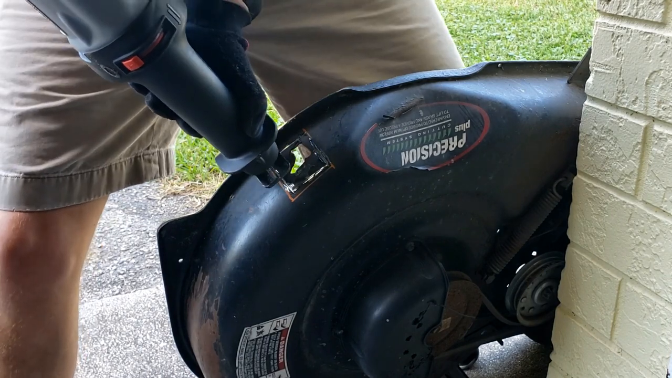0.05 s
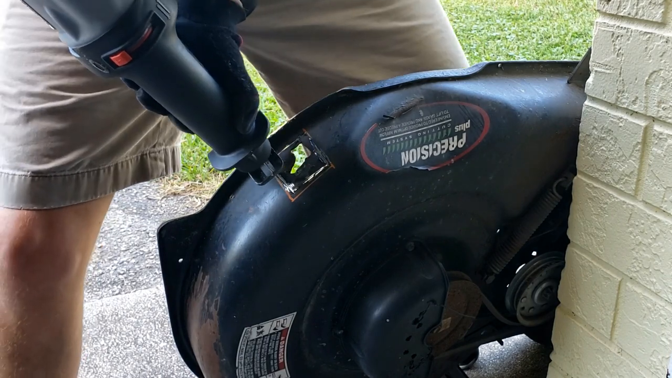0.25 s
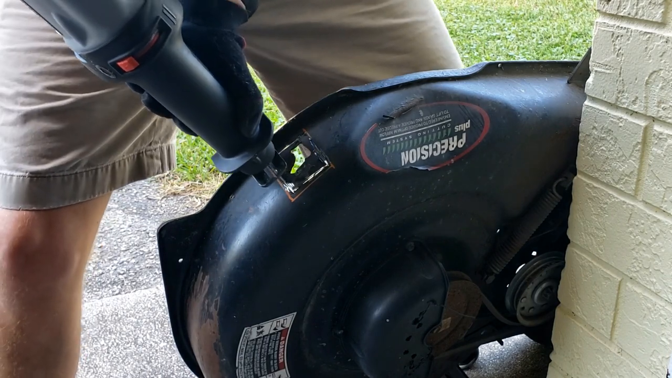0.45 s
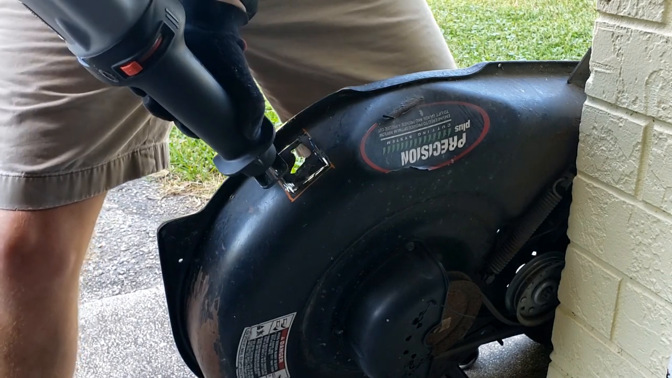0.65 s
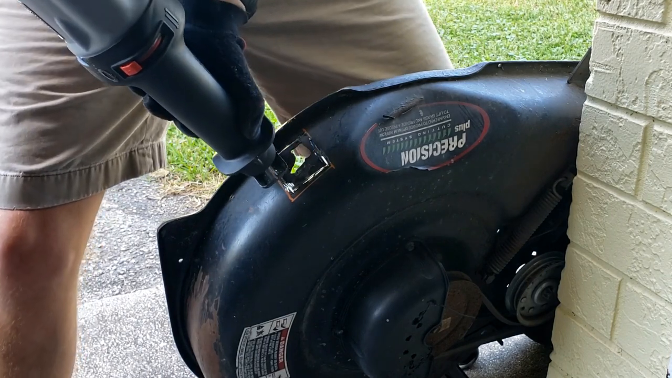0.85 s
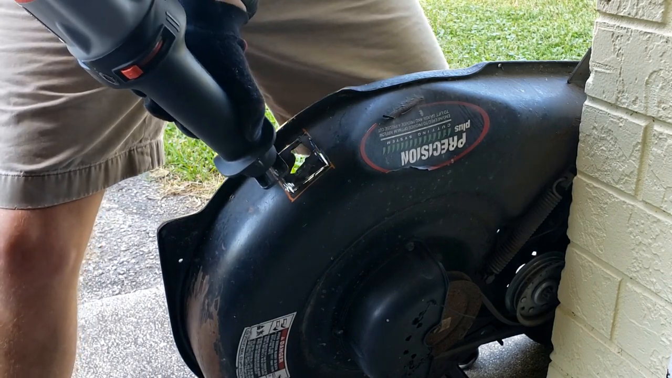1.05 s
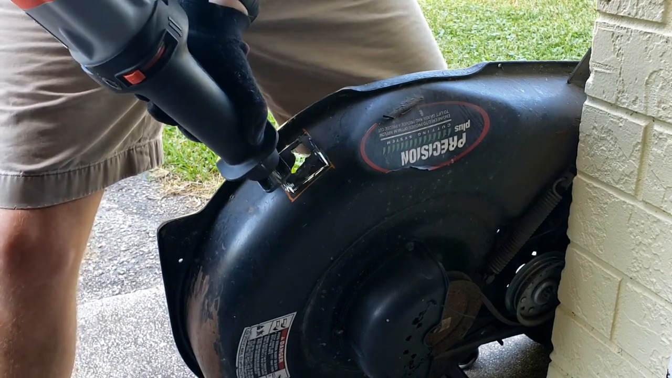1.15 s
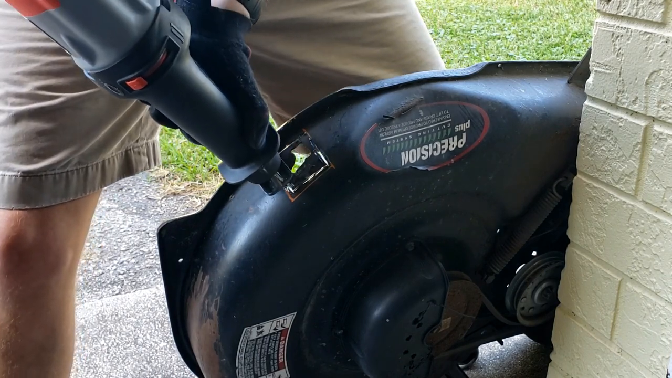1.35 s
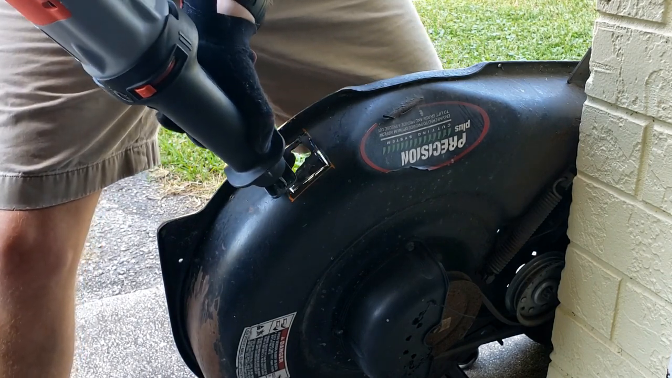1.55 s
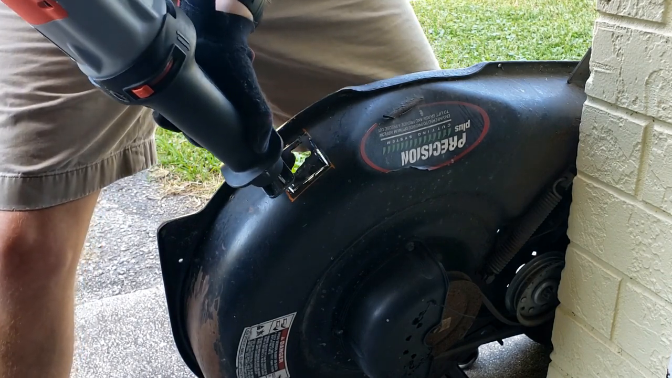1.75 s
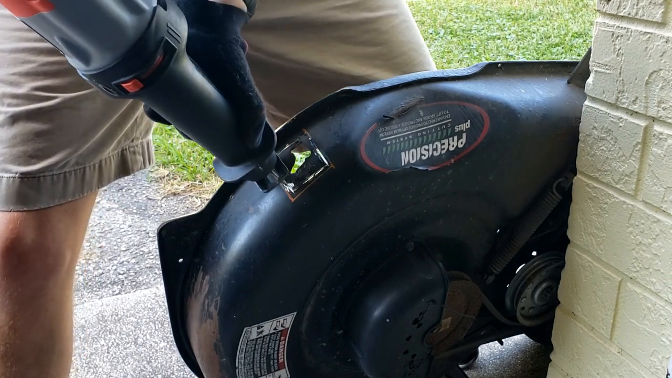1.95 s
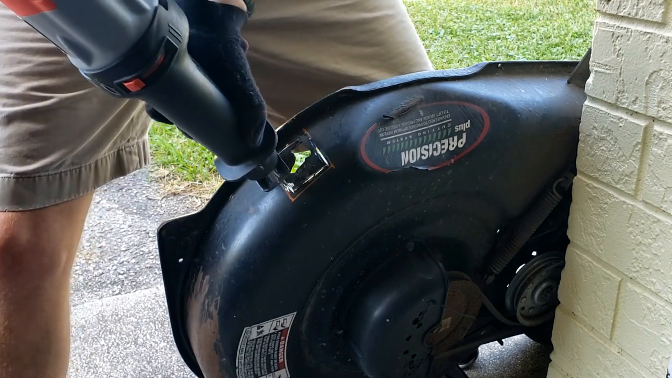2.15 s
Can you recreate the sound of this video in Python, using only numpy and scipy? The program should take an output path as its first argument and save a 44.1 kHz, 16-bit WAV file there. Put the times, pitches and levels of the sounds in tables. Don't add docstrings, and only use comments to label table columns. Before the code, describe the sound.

A reciprocating saw cuts a thin steel mower deck close to the microphone outdoors; uneven clattering strokes, hard snags and ringing clangs build, then it runs down with a last knock over faint breeze.

```python
import sys
import numpy as np
from scipy import signal
from scipy.io import wavfile

SR = 44100
rng = np.random.default_rng(int(sys.argv[2]) if len(sys.argv) > 2 else 0)


def nominal_scale(level):
    x = np.asarray(level, float) / 20
    return 10 ** x


def wav_out(sig):
    wavfile.write(sys.argv[1], SR, np.round(np.clip(np.atleast_2d(sig).T, -1, 1) * 32767).astype(np.int16))


N = 97020


def rms_one(x):
    return x / np.sqrt(np.mean(x ** 2) + 1e-20)


def drift(rate):
    hop = 40
    settle = 2000
    r = np.exp(-2 * np.pi * rate * hop / SR)
    white = rng.standard_normal(N // hop + 2 + settle)
    slow = signal.lfilter([1], [1, -2 * r, r * r], white)[settle:]
    return np.interp(np.arange(N) / hop, np.arange(len(slow)), rms_one(slow))


def at_hz(points, hz):
    points = np.array(points)
    return np.interp(np.log(hz), np.log(points[:, 0]), points[:, 1])


def bandpass(x, low_hz, high_hz):
    return signal.sosfilt(signal.butter(2, [low_hz, high_hz], "band", fs=SR, output="sos"), x)


LEFT_DB, LEFT_LAG_S = -0.97, 0.000115


def late(pair, lag_s):
    n = np.arange(N)
    left = np.interp(n - lag_s * SR, n, pair[0])
    return np.array([nominal_scale(LEFT_DB) * left, pair[1]])


# (frequency [Hz], shared part [0-1])
LIKENESS = [(100, .98), (500, 0.79), (1200, 0.54), (2500, 0.35), (6000, 0.035), (14000, 0.06)]


def likeness(hz):
    return np.clip(at_hz(LIKENESS, hz), 0, 1)


def banded(spectrum, patchy_db, rate):
    out = 0
    edges = 18.6 * 2 ** np.arange(0, 10.1, 0.5)
    white = rng.standard_normal((2, 2, N))
    for k, (low, high) in enumerate(zip(edges, edges[1:])):
        if spectrum[0][0] >= high or low >= spectrum[-1][0]:
            continue
        hz = np.sqrt(low * high)
        mid, side = bandpass(white[k % 2], low, high)
        alike = likeness(hz)
        pair = np.sqrt(1 + alike) * mid + np.sqrt(1 - alike) * side * [[1], [-1]]
        out = out + nominal_scale(at_hz(spectrum, hz) + patchy_db * drift(rate)) * pair
    return rms_one(out)


def line(power, hz):
    level = np.sqrt(2 * power) * nominal_scale(1.6 * drift(42))
    pitch = hz * (1 + 0.0031 * drift(12.2))
    x = level * np.sin(2 * np.pi * np.cumsum(pitch) / SR)
    return late([x, x], LEFT_LAG_S)


MODE_LAG_SPREAD_S, MODE_SIDE = 0.00003, 0.38


def mode(force, hz, t60):
    r, w = nominal_scale(-60 / (t60 * SR)), 2 * np.pi * hz / SR
    gain = np.sin(w) * rng.choice([-1, 1])
    mid, side = signal.lfilter([0, gain], [1, -2 * r * np.cos(w), r * r], force + 1e-18)
    side = side * np.sqrt(1 - likeness(hz)) * MODE_SIDE
    lag_s = LEFT_LAG_S + MODE_LAG_SPREAD_S * hz / 1000 * rng.standard_normal()
    return late([mid + side, mid - side], max(lag_s, 0))


STAGES = [
    0.33,
    0.99,
    1.56,
]
WEIGHT_WANDER_DB = 2.0


def staged(force, modes):
    t = np.arange(N) / SR
    out = 0
    for hz, early, middle, final, t60 in modes:
        weight_db = np.interp(t, STAGES, [early, middle, final])
        out = out + mode(force * nominal_scale(weight_db + WEIGHT_WANDER_DB * drift(4.2)), hz, t60)
    return out


def bursts(rows, rise_s, fall_s, peak_s, axis):
    rows = np.array(rows)
    t = np.arange(N) / SR - rows[:, :1] - peak_s
    swell = np.exp(-(t / rise_s) ** 2)
    decay = np.exp(-2 * np.maximum(t, 0) / fall_s)
    return nominal_scale(2 * rows[:, axis]) @ np.where(t < 0, swell, decay)


# (time [s], level [dB])
BREEZE_LEVEL = [
    (0.0, -53.5),
    (0.6, -51),
    (1.03, -53.5),
    (1.44, -61.5),
    (1.689, -55.5),
    (2.2, -57.5),
]
# (frequency [Hz], level [dB])
BREEZE_COLOUR = [(20, -29), (40, -3.5), (60, -2), (100, 4.5), (140, -14), (220, -20)]


def breeze():
    level = nominal_scale(np.interp(np.arange(N) / SR, *np.transpose(BREEZE_LEVEL)))
    return level * banded(BREEZE_COLOUR, patchy_db=2, rate=4)


# (frequency [Hz], level [dB])
AIR_COLOUR = [(88, -25.5), (150, -3), (269, -32.5), (804, -3.5), (2010, -30.5), (2970, -46), (15900, -63)]
AIR_DB = -48


def air():
    return nominal_scale(AIR_DB) * banded(AIR_COLOUR, patchy_db=6.5, rate=2.3)


# (start [s], end [s], frequency [Hz])
SQUEAL_LINES = [(-.02, .05, 1308), (-.02, .075, 1254), (.215, .255, 2120), (1.22, 1.5, 4700),
                (1.24, 1.39, 1688), (1.76, 1.87, 3193), (1.74, 1.87, 1688), (1.885, 1.97, 4120),
                (1.885, 1.94, 2357), (1.94, 2.0, 2165), (2.03, 2.12, 205), (2.1, 2.165, 1325)]
SQUEAL_LEVELS = [-45, -44, -43, -55, -53, -51, -50, -52, -55, -58, -46, -57]


def squeals():
    t = np.arange(N) / SR
    out = 0
    for (start, end, hz), db in zip(SQUEAL_LINES, SQUEAL_LEVELS):
        fade = np.clip(np.minimum(t - start, end - t) / 0.016, 0, 1)
        out = out + line(nominal_scale(2 * db) * fade ** 2, hz)
    return out


# (time [s], level [dB])
MOTOR_EFFORT = [(0.0, -46.5), (0.068, -51), (0.13, -36.5), (0.19, -48.5), (0.29, -39), (0.38, -36),
                (0.47, -36), (0.73, -32.5), (1.03, -35.5), (1.25, -44.5), (1.65, -37.5), (1.801, -40.5),
                (1.92, -57), (1.99, -56), (2.05, -62), (2.1, -78), (2.2, -82)]


def effort_db():
    return np.interp(np.arange(N) / SR, *np.transpose(MOTOR_EFFORT))


TEETH_PER_S, TOOTH_SPREAD_DB = 1500, 4


def teeth():
    sizes = nominal_scale(TOOTH_SPREAD_DB * np.minimum(rng.exponential(1, (2, N)), 3))
    signs = rng.choice([-1, 1], (2, N))
    bites = rng.random((2, N)) < TEETH_PER_S / SR
    scrape = 0.28 * rng.standard_normal((2, N))
    return rms_one(sizes * signs * bites + scrape)


# (time [s], shell level [dB], hiss level [dB], boom level [dB])
LIGHT_STROKES = [(0.001, -37, -57, -42), (0.015, -42, -63, -31), (0.062, -38, -62, -39),
                 (0.195, -31, -44, -48), (0.374, -21.5, -33, -23), (0.65, -13, -48, -44),
                 (0.675, -20, -51, -41), (0.871, -26, -38.5, -42), (1.131, -18, -30, -23),
                 (1.443, -44, -57, -58), (1.523, -22, -56, -18.5), (1.607, -18, -39, -18.5),
                 (1.656, -17.5, -33.5, -38), (1.935, -43.5, -49, -62), (2.055, -33.5, -48, -28),
                 (2.163, -60, -80, -53), (0.09, -32, -45.5, -36), (0.12, -24.5, -43, -34),
                 (0.149, -23.5, -38, -47), (0.213, -20, -36, -35), (0.235, -22, -30, -32),
                 (0.263, -20.5, -57, -29), (0.31, -18, -32, -60), (0.362, -20.5, -31, -28),
                 (0.387, -19.5, -30, -20), (0.431, -25, -43, -26.5), (0.454, -24.5, -35.5, -31),
                 (0.557, -14, -29, -21), (0.839, -16, -26.5, -51), (0.972, -13, -54, -34),
                 (1.04, -18.5, -37, -54), (1.077, -18.5, -32, -53), (1.199, -18, -37.5, -30),
                 (1.25, -24, -37.5, -32), (1.295, -22.5, -34, -38), (1.358, -24, -42, -50),
                 (1.398, -22, -38, -47), (1.458, -20.5, -41, -48), (1.501, -16.5, -35, -21.5),
                 (1.769, -28, -37, -28.5), (1.791, -21, -54, -55), (1.836, -26, -42, -65),
                 (1.903, -57, -44.5, -62), (2.01, -31.5, -45.5, -27), (2.03, -25.5, -41.5, -23.5),
                 (2.126, -47, -73, -38)]
# (time [s], shell level [dB], hiss level [dB], boom level [dB], rim ring level [dB])
HARD_SNAGS = [
    (0.499, -13.5, -26.5, -23, -25),
    (0.515, -9, -26, -15, -29),
    (0.623, -4, -22.5, -18.5, -19),
    (0.735, -1, -20.5, -16.5, -20),
    (0.933, -4, -21, -15, -11.5),
    (1.139, -5, -22, -18.5, -15.5),
    (1.558, -8, -26, -16.5, -22),
    (1.667, -4, -25, -14.5, -17),
]
SNAG_RISE_S, SNAG_FALL_S, SNAG_PEAK_S = 0.0061, 0.0076, 0.00198
STROKE_RISE_S, STROKE_FALL_S, STROKE_PEAK_S = 0.004, 0.0067, 0.00093
RATTLE_FLICKER_DB = 1


def stroke_power(axis):
    return bursts(LIGHT_STROKES, STROKE_RISE_S, STROKE_FALL_S, STROKE_PEAK_S, axis)


def push(rattle_db, axis):
    snag_power = bursts(HARD_SNAGS, SNAG_RISE_S, SNAG_FALL_S, SNAG_PEAK_S, axis)
    motor_db = effort_db() + rattle_db - 6.0 + RATTLE_FLICKER_DB * drift(37)
    return np.sqrt(snag_power + stroke_power(axis) + nominal_scale(2 * motor_db))


JOLT_DB = 16.5


def jolts(axis):
    out = np.zeros((2, N))
    for rows, peak_s in ((HARD_SNAGS, SNAG_PEAK_S), (LIGHT_STROKES, STROKE_PEAK_S)):
        rows = np.array(rows)
        at = ((rows[:, 0] + peak_s) * SR).astype(int)
        out[0, at] = nominal_scale(rows[:, axis] + JOLT_DB)
    return out


def shell_force():
    return push(rattle_db=11, axis=1) * teeth() + jolts(axis=1)


# (frequency [Hz], early level [dB], middle level [dB], late level [dB], T60 [s])
SHELL_MODES = [(1190.6, 1.5, -13.5, -6, 0.067), (742, -20.5, -28, -35, 0.44), (811, -18.5, -18, -12, 0.16),
               (910, -3, -4.5, -5, 0.023), (969.5, -9.5, -9.5, -5, 0.15), (1042, -10, -9, -5, 0.21),
               (1076, -11, -6, -7, 0.17), (1128.3, -9, -8, -7, 0.18), (1076, 0, -1, 3, 0.057),
               (1154, -7.5, -4, -14, 0.091), (1197, 1.5, -28, -13, 0.05), (1275, -7.5, -27, -27, 0.45),
               (1293, -10, -31, -22, 0.28), (1498, -18, -30, -13.5, 0.11)]


def shell(force):
    return nominal_scale(-29.5) * staged(force, SHELL_MODES)


MAIN_HZ, MAIN_SNAG_DB, MAIN_STROKE_DB, MAIN_TAIL_DB = 1123, -10, -10, -17
MAIN_RISE_S, MAIN_STROKE_RISE_S, MAIN_FALL_S, MAIN_TAIL_S = 0.0076, 0.0052, 0.012, 0.054


def main_ring():
    snag = bursts(HARD_SNAGS, MAIN_RISE_S, MAIN_FALL_S, SNAG_PEAK_S, axis=1)
    stroke = bursts(LIGHT_STROKES, MAIN_STROKE_RISE_S, MAIN_FALL_S, SNAG_PEAK_S, axis=1)
    tail = bursts(HARD_SNAGS, MAIN_RISE_S, MAIN_TAIL_S, SNAG_PEAK_S, axis=1)
    power = nominal_scale(2 * MAIN_SNAG_DB) * snag + nominal_scale(2 * MAIN_STROKE_DB) * stroke + nominal_scale(2 * MAIN_TAIL_DB) * tail
    return line(power, MAIN_HZ)


# (frequency [Hz], early level [dB], middle level [dB], late level [dB], T60 [s])
FLAP_MODES = [(211.8, -10, -27, -21, 0.24), (255, -10, -16.5, -38, 0.092), (308, -4.5, -13, -10.5, 0.19),
              (393.1, -7, -4.5, -11, 0.17), (431.8, -0.5, -15, -20, 0.32), (467.4, -10.5, -7, -9.5, 0.17),
              (523.5, -11, 2.5, -5.5, 0.19), (589, 2.5, -7, -5, 0.037), (713, -26, -14, -8.5, 0.059),
              (796, -14, -10, -23, 0.097), (960, -23, -1, -12, 0.06), (154.5, -7, -17, -26, 0.15)]
THUD_DB, THUD_LOW_HZ, THUD_HIGH_HZ = -26, 162, 1500


def flap():
    force = push(rattle_db=7.5, axis=3) * teeth() + jolts(axis=3)
    thud = bandpass(force[0], THUD_LOW_HZ, THUD_HIGH_HZ)
    return nominal_scale(-29) * staged(force, FLAP_MODES) + nominal_scale(THUD_DB) * late([thud, thud], LEFT_LAG_S)


# (frequency [Hz], density [dB per Hz])
UPPER_COLOUR = [(1300, -9), (2000, -10.5), (3100, -9.5), (5500, -16), (8300, -30.5), (9700, -21),
                (12500, -20), (16500, -26.5)]
UPPER_MODES_DB, UPPER_T60_S, RATTLE_HISS_DB = -5.5, 0.16, -2.5
HISS_DB, HISS_RISE_S, HISS_T60_S, HISS_PEAK_S, LEFT_TREBLE_DB = 1.5, 0.0075, 0.26, 0.0037, 1.36


def upper_modes():
    count = 66
    pitches = np.geomspace(1350, 7500, count) * rng.uniform(0.992, 1.008, count)
    scatter_db, stretch = rng.uniform(-4, 2, count), rng.uniform(0.5, 1.2, count)
    force = push(RATTLE_HISS_DB, axis=2) * teeth()
    out = 0
    for hz, db, k in zip(pitches, scatter_db, stretch):
        gain = nominal_scale(at_hz(UPPER_COLOUR, hz) + db) * np.sqrt(hz / 2000)
        out = out + gain * mode(force, hz, UPPER_T60_S * k)
    return nominal_scale(UPPER_MODES_DB - 22.5) * out


def tooth_hiss():
    fall_s = HISS_T60_S / np.log(1000)
    power = nominal_scale(2 * (effort_db() + RATTLE_HISS_DB))
    for rows in (HARD_SNAGS, LIGHT_STROKES):
        power = power + bursts(rows, HISS_RISE_S, fall_s, HISS_PEAK_S, axis=2)
    noise = banded(UPPER_COLOUR, patchy_db=3.0, rate=27)
    hiss = late(np.sqrt(power) * noise, LEFT_LAG_S)
    return nominal_scale(HISS_DB) * hiss * nominal_scale([[LEFT_TREBLE_DB], [0]])


RIM_DB, RIM_STROKE_DB, RIM_LINE_DB, RIM_LINE_PEAK_S = -23.5, -18.5, -0.5, 0.004


def rim_force():
    snag_power = bursts(HARD_SNAGS, SNAG_RISE_S, SNAG_FALL_S, SNAG_PEAK_S + 0.0033, axis=4)
    power = snag_power + nominal_scale(2 * RIM_STROKE_DB) * stroke_power(axis=1)
    return np.sqrt(power + nominal_scale(2 * (effort_db() - 8.5))) * teeth()


# (frequency [Hz], level [dB], T60 [s])
RIM_MODES = [
    (1688, 1.5, 0.16),
    (1726, 0.5, 0.1),
    (2216, -3.5, 0.092),
    (1784, -13, 0.27),
    (2959, -3, 0.081),
    (3204, -2.5, 0.068),
    (3990, -8.5, 0.069),
    (5240, -16, 0.047),
]


def rim(force):
    return nominal_scale(RIM_DB) * sum(nominal_scale(db) * mode(force, hz, t60) for hz, db, t60 in RIM_MODES)


def rim_ring():
    hz, _, t60 = RIM_MODES[0]
    power = bursts(HARD_SNAGS, 0.0073, t60 / np.log(1000), RIM_LINE_PEAK_S, axis=4)
    return nominal_scale(RIM_LINE_DB - 9) * line(power, hz)


# (time [s], level [dB])
FLAP_HUMS = [(.95, -53), (1.15, -33), (1.25, -43.5), (1.33, -52), (1.41, -47), (1.5, -36.5), (1.565, -30),
             (1.675, -32.5), (1.775, -36), (1.85, -45.5), (2.035, -35.5)]
HUM_HZ, HUM_RISE_S, HUM_T60_S = 391.4, 0.0083, 0.57


def flap_hum():
    return line(bursts(FLAP_HUMS, HUM_RISE_S, HUM_T60_S / np.log(1000), 0, axis=1), HUM_HZ)


SHELL_LOW_CUT_HZ = 188


def scene():
    on_shell, on_rim = shell_force(), rim_force()
    steel = shell(on_shell) + rim(on_rim) + flap() + upper_modes() + tooth_hiss()
    low_cut = signal.butter(4, SHELL_LOW_CUT_HZ, "high", fs=SR, output="sos")
    steel = signal.sosfilt(low_cut, steel)
    return steel + breeze() + squeals() + flap_hum() + rim_ring() + air() + main_ring()


def band_limit(x):
    return signal.sosfilt(signal.butter(12, 16090, fs=SR, output="sos"), x)


SELF_NOISE_DB, CEILING, CUTOFF_HZ = -68, 1.05, 15960


def record(dry):
    noisy = dry + nominal_scale(SELF_NOISE_DB) * rng.standard_normal(dry.shape)
    limited = noisy / (1 + (np.abs(noisy) / CEILING) ** 4) ** (1 / 4)
    top_cut = signal.ellip(14, 0.5, 70, CUTOFF_HZ, fs=SR, output="sos")
    return band_limit(signal.sosfilt(top_cut, limited))


dry = scene()
out = record(dry)
wav_out(out)
```